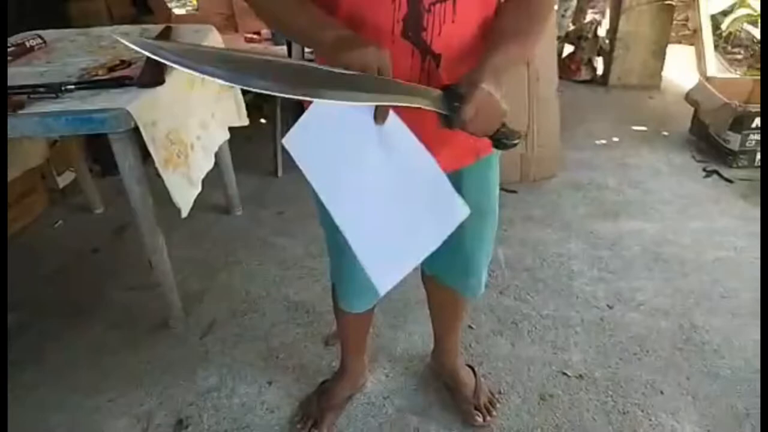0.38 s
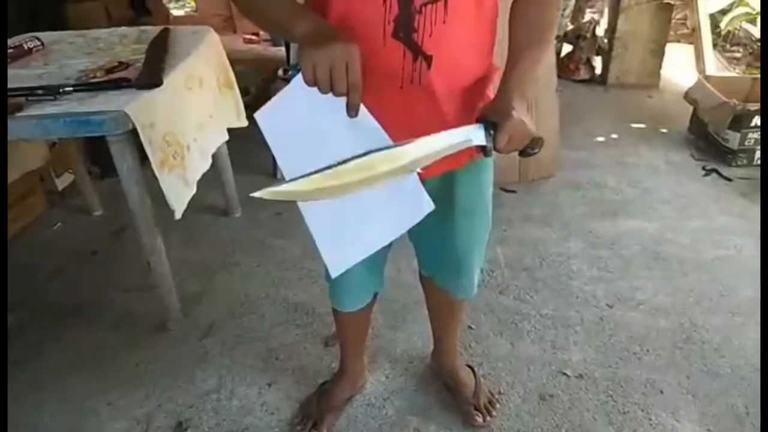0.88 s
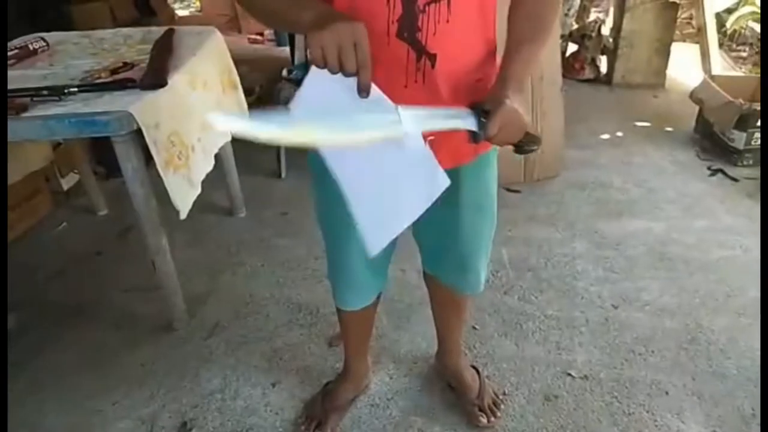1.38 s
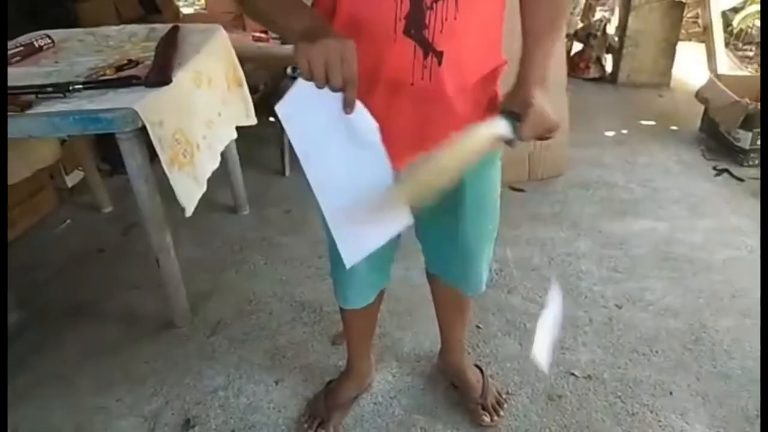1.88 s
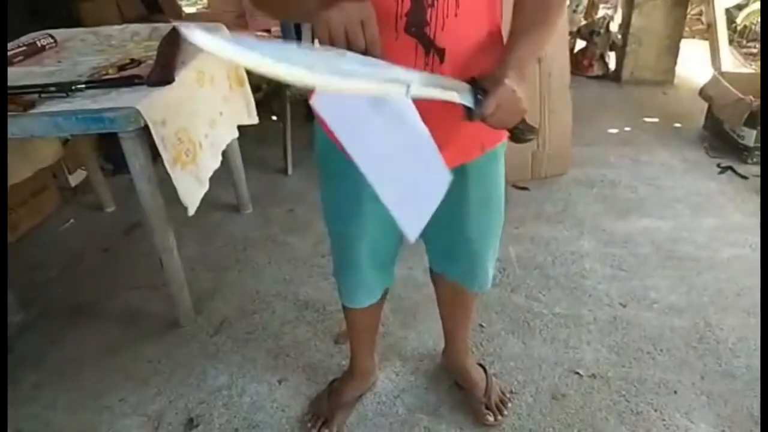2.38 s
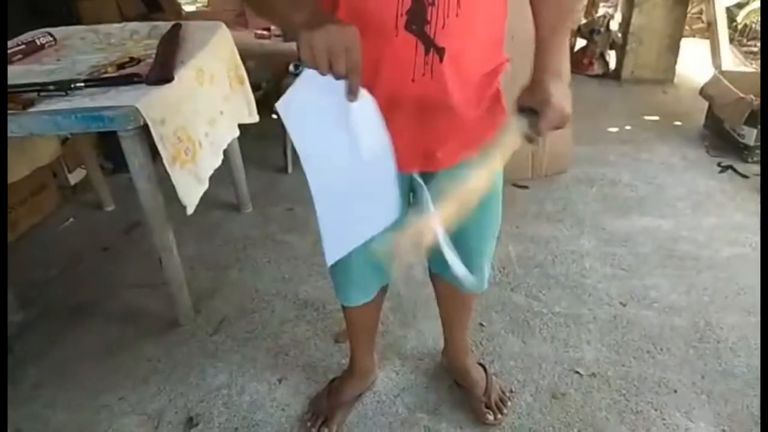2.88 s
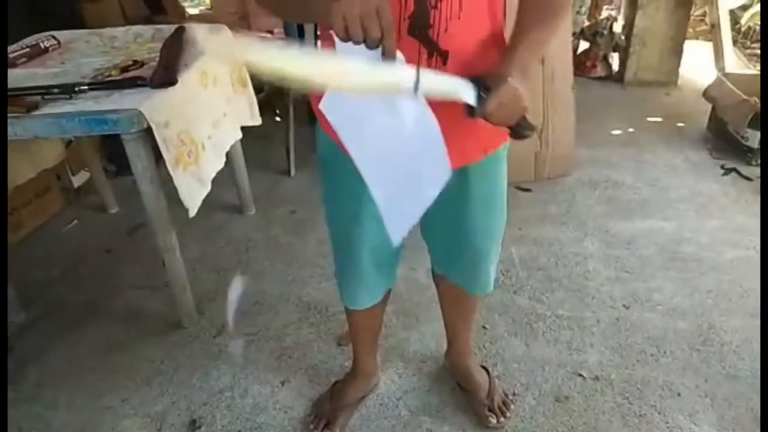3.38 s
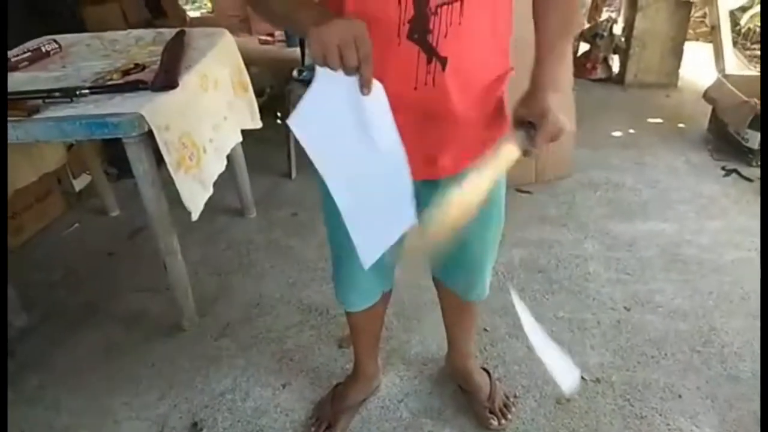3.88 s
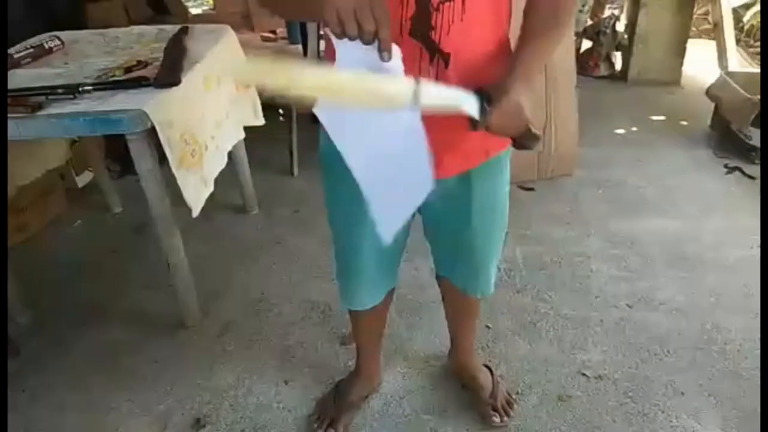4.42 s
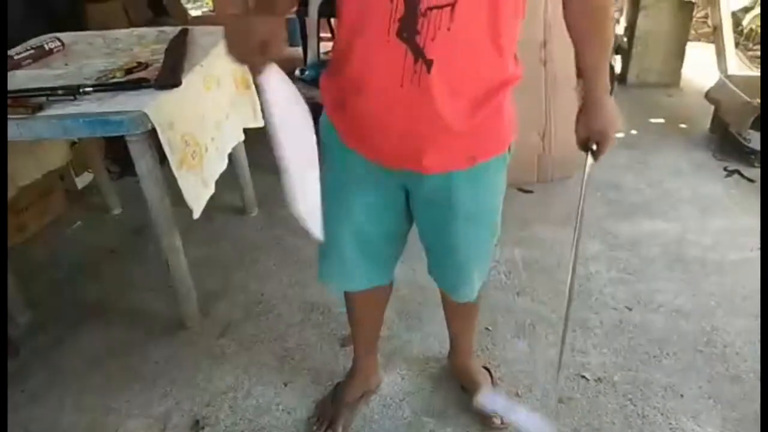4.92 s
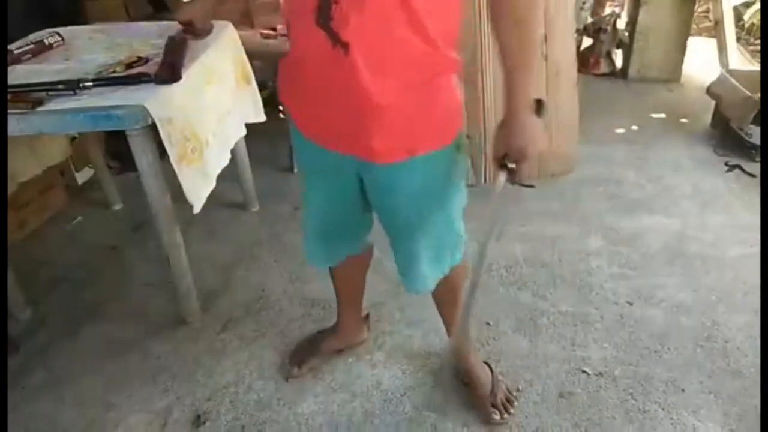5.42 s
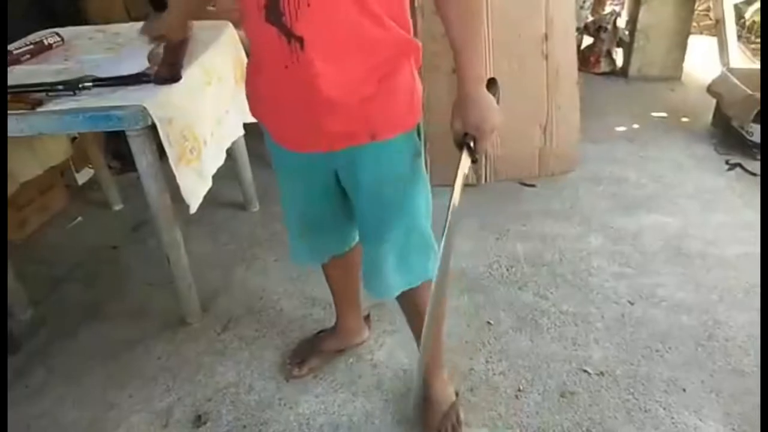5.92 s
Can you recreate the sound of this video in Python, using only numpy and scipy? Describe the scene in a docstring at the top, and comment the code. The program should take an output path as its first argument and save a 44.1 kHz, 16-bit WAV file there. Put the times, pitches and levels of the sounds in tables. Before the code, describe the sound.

In an open concrete shed, a blade rips through a hand-held sheet in five dry, crackling strokes of about half a second, with small rustles between them. The later cuts are stronger, and the last begins with a sharp snap. Then the paper is laid down with faint flutters and small hollow taps. Underneath are low soft thuds, a distant idling engine and a quiet airy outdoor murmur, recorded in stereo from nearby.

```python
"""A long blade slices five strips off a sheet of paper in an open concrete shed; the sheet is then laid on a table.
Parting fibres make a dense crackle of random clicks, which the resonances of the sheet colour.
Paper and table clatter as ticks in small hollow resonances; something is dragged briefly over the floor in uneven slips.
Far off an engine throbs at idle and something thuds twice, as short swells of low tone over narrow noise.
The yard murmurs as drifting coloured noise, and sparse random echoes make the shed answer."""
import sys
import numpy as np
from scipy import signal
from scipy.fft import rfft, irfft
from scipy.io import wavfile
from scipy.ndimage import uniform_filter1d

SR = 44100
rng = np.random.default_rng(int(sys.argv[2]) if len(sys.argv) > 2 else 0)


def ratio_of_db(decibels):
    """Turn decibels (scalar or array-like) into linear amplitude factors; 0 dB maps to 1."""
    return 10 ** (np.asarray(decibels, float) / 20)


def transcribe(signal):
    """Save signal, clipped to [-1, 1], as a 16-bit WAV file at the path in sys.argv[1]."""
    frames = np.atleast_2d(signal).T
    limited = np.clip(frames, -1, 1)
    pcm = np.round(limited * 32767).astype(np.int16)
    wavfile.write(sys.argv[1], SR, pcm)


N = 266364  # length in samples

# Levels of the paper, clatter and drag are those before the final mix.
# Pressure of the edge, one curve a cut; the third is the second strip scraping off the blade.
# Each row of a curve: time in seconds, tearing level in dB.
CUT_PRESSURES = [
    [(.495, -57), (.507, -44), (.531, -41), (.605, -54.5), (.628, -45), (.65, -39.5), (.76, -41.5),
     (.885, -38), (.93, -52), (.97, -61)],
    [(1.275, -54), (1.285, -47.5), (1.299, -42), (1.363, -34), (1.45, -35), (1.6, -33), (1.64, -43.5),
     (1.69, -62)],
    [(1.6, -52), (1.648, -43), (1.696, -41), (1.738, -43.5), (1.84, -63.5), (1.87, -56.5), (1.96, -74.5)],
    [(2.27, -61), (2.279, -49), (2.3, -41.5), (2.446, -39), (2.484, -33.5), (2.514, -38.5), (2.646, -32),
     (2.668, -42), (2.72, -57.5), (2.78, -60)],
    [(3.255, -64), (3.294, -41.5), (3.39, -39.5), (3.465, -32), (3.51, -37), (3.53, -29), (3.57, -30),
     (3.62, -31.5), (3.69, -47), (3.76, -75)],
    [(4.18, -55), (4.19, -45), (4.22, -54), (4.255, -47.5), (4.3, -35.5), (4.342, -39.5), (4.43, -32.5),
     (4.53, -29.5), (4.59, -29), (4.638, -39.5), (4.7, -61), (4.76, -82)],
]
# Colour of each cut. Each row: sheet flexing at the start and once freed in dB, edge hiss at the start and
# once freed in dB, starting pitch of the flap resonance in Hz, its strength in dB.
CUT_COLOURS = [(-25, -9, -12.5, -10.5, 3570, 6.5), (-15.5, -13.5, -8, -10, 3400, 4.5),
               (2.5, 1, -29, -21, 3500, 4), (-11.5, -15.5, -10.5, -8, 3300, 4.5),
               (-10.5, -8.5, -5.5, -9, 3200, 4.5), (-16, -5.5, -9.5, -12, 3300, 2.5)]
# The flexing, hiss and crispness, in dB, at which the sheet has its plain colour.
PLAIN_COLOUR_DB = (-11, -8, -3)
# Plain colour of the sheet. Each row: frequency in Hz, relative level in dB.
SHEET_SPECTRUM = [(120, -57), (200, -26), (474, -29.5), (537, -7), (687, -14.5), (1230, -7.5), (1690, -4.5),
                  (2010, -8), (3480, -4), (5900, -1), (7820, -11), (8540, -13.5), (10200, -7.5),
                  (12600, -8), (13500, -10)]
# The sheet rustles in the hand. Each row: time of the peak in seconds, peak tearing level in dB,
# rise in seconds, fall in seconds, brightness in dB.
HAND_RUSTLES = [(.004, -47.5, 0.0041, 0.023, -20), (0.136, -54, .015, 0.21, -1.5),
                (0.381, -56.5, 0.037, 0.16, -8.5), (2.858, -58.5, 0.041, 0.056, 4),
                (3.23, -60, 0.043, 0.044, -6), (4.11, -61.5, .015, 0.02, -4),
                (4.835, -58.5, 0.077, 0.033, 7.5), (5.15, -66, 0.018, 0.093, -2),
                (5.275, -54.5, .05, 0.073, -5.5), (5.401, -73, 0.052, 0.14, 8),
                (5.872, -59, 0.19, 0.071, 2.5), (5.989, -65, .03, 0.031, -2)]
# Single snaps where the edge bites. Each row: start in seconds, peak in dB, centre in Hz.
EDGE_SNAPS = [(0.5054, -35, 3620), (2.2799, -31, 2820), (4.1891, -36, 4800), (4.296, -16, 3670)]
# How the paper leans to one side. Each row: frequency in Hz, left minus right in dB.
PAPER_LEAN = [(60, 0.0), (130, 10), (280, -4), (610, 1), (1330, 0.5), (2890, 3.5), (6280, -5), (13600, 6)]
# Small hollow clatters of paper and table. Each row: time in seconds (the peak comes 5 ms before it),
# level before fading in dB, centre in Hz, fading time in seconds.
HOLLOW_CLATTERS = [(0.364, -55, 920, 0.043), (0.686, -49, 1510, 0.022), (2.666, -44.5, 1040, 0.013),
                   (2.171, -67, 1020, 0.067), (2.737, -49.5, 850, 0.029), (3.063, -61.5, 920, 0.034),
                   (4.975, -59, 815, 0.033), (5.319, -51.5, 920, 0.02), (5.495, -57, 1350, 0.025),
                   (5.69, -59, 1060, 0.012), (5.955, -58, 1410, 0.016)]
# Loudness of the drag over the floor. Each row: time in seconds, level of each ring's shared curve in dB.
DRAG_LEVEL = [(1.57, -70), (1.59, -51), (1.64, -48), (1.684, -43), (1.798, -58.5), (1.89, -62),
              (1.912, -63.5), (1.984, -72), (2.08, -98)]
# Resonances of the dragged object. Each row: frequency in Hz, width in Hz, relative level in dB.
DRAGGED_RINGS = [(140, 99, -8.5), (256, 100, -14.5), (324, 74, -5), (406, 82, 2), (606, 170, -3.5),
                 (812, 85, -1), (970, 270, 0), (1420, 170, -18)]
# Low thuds, bumps and uneven engine throbs at set times.
# Each row: time of the middle in seconds, level in dB, pitch in Hz.
SET_BUMPS = [(.119, -42.5, 242), (0.302, -48.5, 64), (0.374, -43.5, 74.5), (.525, -44.5, 267),
             (0.686, -49, 68.7), (.71, -41, 285), (1.477, -31.5, 88.6), (1.562, -37.5, 86),
             (1.67, -40, 140), (2.128, -49, 62), (2.73, -45, 246), (2.805, -53, 62), (2.845, -46, 139),
             (2.936, -50.5, 64), (3.032, -45, 129), (3.122, -46.5, 123), (3.213, -47, 137), (3.42, -49, 64),
             (3.619, -48.5, 64.3), (3.868, -53.5, 61.5), (4.141, -52.5, 61), (4.244, -50, 60.4),
             (4.414, -49.5, 63), (4.56, -46, 65), (4.578, -40.5, 274), (4.851, -48.5, 177),
             (5.247, -47, 153), (4.449, -47.5, 270), (4.506, -45.5, 272), (0.301, -45, 246),
             (3.139, -44.5, 263)]
# The two pitches in Hz, low and high, around which the randomly scattered bumps lie.
SCATTERED_PITCHES_HZ = (140, 260)
# Steady part of the engine. In order: frequency in Hz, width in Hz, level in dB.
ENGINE_IDLE = (62.8, 4.1, -68.5)
# Colour of the low murmur of the yard. Each row: frequency in Hz, relative level in dB.
MURMUR_SPECTRUM = [(15, -72), (25, -38), (48, -26), (123, -3.5), (176, -9.5), (321, -10), (484, -13.5),
                   (648, -17), (1010, -21.5), (1500, -28), (1950, -82), (3300, -120)]
# Loudness of the low murmur. Each row: time in seconds, level in dB.
MURMUR_LEVEL = [(0.0, -55), (0.3, -55), (0.71, -54), (1.11, -63), (1.48, -56.5), (1.83, -51.5),
                (2.1, -57.5), (3.58, -56.5), (4.09, -60.5), (4.41, -56), (4.56, -51.5), (5.06, -61),
                (5.58, -57), (6.04, -61.5)]
# Colour of the airy treble of the yard. Each row: frequency in Hz, relative level in dB.
AIR_SPECTRUM = [(530, -21), (900, -7), (1150, -13), (1260, -15.5), (1420, -10), (2130, -10), (3090, -13.5),
                (3350, -10), (5270, -18.5), (13500, -26)]
# Loudness of the airy treble. Each row: time in seconds, level in dB.
AIR_LEVEL = [(0, -53), (.5, -71.5), (1.2, -67), (2.1, -65.5), (3.1, -65.5), (4, -67), (4.9, -64),
             (5.4, -62), (6.04, -61)]
# How alike left and right are outdoors. Each row: frequency in Hz, likeness (1 is identical).
SIDE_LIKENESS = [(60, 1), (180, 0.92), (530, 0.73), (1500, 0), (4600, 0.07), (13600, 0.)]
# Echo of the shed. Each row: frequency in Hz, time in seconds to die by 60 dB.
SHED_DECAY = [(250, 0.19), (1000, 0.19), (4000, 0.22), (12000, 0.11)]

FLAP_SAG, FREE_AT = 0.063, 0.77  # share of pitch the flap loses; share of the cut at which it is free
WANDER_DB, CRISP_DB = 1.8, 0.5  # random drift of flexing, hiss and crispness; crispness over hiss
RUSTLE_EDGE_DB, RUSTLE_FLAP_HZ = -15, 3500  # ends of a rustle below its peak; its flap resonance
DULL_FLEXING = 0.65  # dB of flexing gained per dB of brightness lost
BUMP_S, SHORTER = 0.059, 0.79  # half-length in seconds at 65 Hz; power by which higher bumps are shorter
SCATTERED_BUMPS, SCATTERED_DB = 24, -52.5  # number of bumps at random times and their middle level
FIRST_THROB_S, THROB_GAP_S = 5.115, 0.118  # the engine settles into an even beat
THROB_DB, THROB_HZ = -50, 67


def evened(x):
    """Scales a sound to an rms of 1."""
    return x / np.sqrt(np.mean(x ** 2) + 1e-20)


def read(points, hz):
    """Reads a spectrum between its points, with frequency on a log axis."""
    f, value = np.transpose(points)
    return np.interp(np.log(hz + 1), np.log(f + 1), value)


def along(rows, t):
    """Reads a curve of level against time."""
    times, values = np.transpose(rows)
    return np.interp(t, times, values)


def add(mix, s, sound):
    """Mixes a sound in, starting at s seconds."""
    part = mix[round(s * SR):][:len(sound)]
    part += sound[:len(part)]


def resonate(x, hz, width):
    """Rings one resonance of gain 1: shift it down to 0 Hz, smooth, shift back up."""
    turn = np.exp(2j * np.pi * hz * np.arange(len(x)) / SR)
    r = np.exp(-np.pi * width / SR)
    return 2 * (turn * signal.lfilter([1 - r], [1, -r], x / turn)).real


def patches(bins, frames, tall, long):
    """Makes random blobs over frequency and time, of rms 1."""
    z = rng.standard_normal((frames, bins)).T
    smooth = uniform_filter1d(z, tall, 0)
    return evened(uniform_filter1d(smooth, long, 1))


def two_sides(left, other, same):
    """Pairs a signal with one that is partly alike, by mixing in an independent signal."""
    return np.array([left, same * left + np.sqrt(1 - same ** 2) * other])


def crackle(count, per_s, spread_db):
    """Scatters random clicks of either sign, a few of them large, as separate breaks or slips would."""
    chance, size, sign = rng.random((count, 3)).T
    happens = chance < per_s / SR
    height = ratio_of_db(spread_db * np.minimum(-np.log(size + 1e-9), 4))
    return evened(happens * np.sign(sign - 0.5) * height)


def stroke(rows, flexing_db, freed_db, hiss_db, last_hiss_db, flap_hz, flap_db):
    """Parting fibres click in clumps; the sheet colours them with shifting resonances, differently to each side."""
    t = np.arange(rows[0][0], rows[-1][0], 1 / SR)
    # The edge catches and lets go.
    clumps = ratio_of_db(1.4 * evened(uniform_filter1d(rng.standard_normal(len(t)), size=200)))
    fibres = [evened(clumps) * crackle(len(t), 7000, spread_db=1.8) for side in range(2)]
    hz, s, (left, other) = signal.stft(np.array(fibres), SR, nperseg=256, noverlap=192)
    f = hz[:, None] + 1

    # The flap comes free as the cut goes on, and its ring sinks.
    free = np.minimum(s / s[-1] / FREE_AT, 1) ** 0.84
    drift = WANDER_DB * patches(3, len(s), tall=1, long=30)
    from_plain = drift - np.array(PLAIN_COLOUR_DB)[:, None]
    flexing = flexing_db + (freed_db - flexing_db) * free + from_plain[0]
    edge = hiss_db + (last_hiss_db - hiss_db) * free
    hiss = edge + from_plain[1]
    crisp = edge + from_plain[2] + CRISP_DB
    flap = flap_hz * (1 - FLAP_SAG * free)

    # Short waves leave the sheet in unlike directions.
    z = two_sides(left, other, same=1 / (1 + f / 3000))

    # Flexing fills the lows, hiss and crispness the highs, and the flap rings in between.
    lows_db = flexing / (1 + (f / 1700) ** 6) / (1 + (620 / f) ** 6)
    hiss_part_db = hiss / (1 + (8300 / f) ** 12)
    crisp_part_db = crisp * np.exp(-(np.log(f / 6200) / 0.23) ** 2)
    ring_db = flap_db * np.exp(-(np.log(f / flap) / 0.5) ** 2)
    shifting_db = 3.0 * patches(*left.shape, tall=2, long=14)
    colour = ratio_of_db(read(SHEET_SPECTRUM, f) + lows_db + hiss_part_db + crisp_part_db + ring_db + shifting_db)

    # The tearing band carries the level.
    band = (hz > 1800) & (hz < 6000)
    colour = colour / np.sqrt((colour[band] ** 2).sum(0) / len(hz))
    sound = signal.istft(z * colour, SR, nperseg=256, noverlap=192)[1][:, :len(t)]
    return sound * ratio_of_db(along(rows, t)) * signal.windows.tukey(len(t), 0.03)


def rustle(s, db, rise, fall, bright_db):
    """A softer stroke as the sheet moves in the hand; a duller rustle flexes more. Returns start and sound."""
    rows = [(max(s - rise, 0), db + RUSTLE_EDGE_DB), (s, db), (s + fall, db + RUSTLE_EDGE_DB)]
    flexing_db = PLAIN_COLOUR_DB[0] - DULL_FLEXING * bright_db
    hiss_db = PLAIN_COLOUR_DB[1] + bright_db
    return rows[0][0], stroke(rows, flexing_db, flexing_db, hiss_db, hiss_db, RUSTLE_FLAP_HZ, flap_db=2.5)


def snap(db, hz):
    """A biting edge gives a puff of noise through a broad resonance, with a quick rise and fall."""
    t = np.arange(600) / SR
    puff = rng.standard_normal(len(t))
    ring = resonate(resonate(puff, hz, 4700), hz, 5500)
    ring = ring * np.exp(-t / 0.0034) * (1 - np.exp(-t / 0.00026))
    ring = signal.sosfilt(signal.butter(2, 1100, "high", fs=SR, output="sos"), ring)  # no bass in a snap
    return ratio_of_db(db) / abs(ring).max() * ring


def paper():
    """The sheet sounds through all its cuts and rustles, and the single snaps."""
    out = np.zeros((2, N))
    for rows, colour in zip(CUT_PRESSURES, CUT_COLOURS):
        add(out.T, rows[0][0], stroke(rows, *colour).T)
    for row in HAND_RUSTLES:
        start, sound = rustle(*row)
        add(out.T, start, sound.T)
    for s, db, hz in EDGE_SNAPS:
        add(out.T, s, snap(db, hz)[:, None])  # alike on both sides
    return out


def clatter():
    """Short bunches of ticks ring a small hollow resonance of paper and table."""
    out = np.zeros(N)
    for s, db, hz, length in HOLLOW_CLATTERS:
        t = np.arange(-0.01, 3 * length, 1 / SR)
        ticks = crackle(len(t), 1500, spread_db=4.0)
        ring = evened(resonate(resonate(ticks, hz, 260), hz, 460))
        swell = np.exp(-abs(t) / np.where(t < 0, 0.006, length))
        add(out, s - 0.015, ratio_of_db(db) * ring * swell)
    return out


def drag():
    """Uneven slips over the floor ring the resonances of the dragged object."""
    t = np.arange(DRAG_LEVEL[0][0], DRAG_LEVEL[-1][0], 1 / SR)
    slips = crackle(len(t), 900, spread_db=1.5)
    rings = 0
    for hz, width, db in DRAGGED_RINGS:
        rings = rings + ratio_of_db(db) * evened(resonate(resonate(slips, hz, width), hz, 2 * width))
    out = np.zeros(N)
    add(out, t[0], rings * ratio_of_db(along(DRAG_LEVEL, t)) * signal.windows.tukey(len(t), 0.1))
    return out


def scattered_bump():
    """Picks a bump at a random time, low or high; the stronger it is, the higher it lies around its pitch."""
    u, v, w = rng.random(3)
    s = 0.081 + u * (N / SR - 0.2)
    return s, SCATTERED_DB + 6 * (v - 0.5), SCATTERED_PITCHES_HZ[int(w < 0.5)] * (0.96 + 0.14 * v)


def lows():
    """Each engine throb, thud or bump is a few cycles of low tone that swell and fade."""
    out = np.zeros(N)
    throbs = [(s, THROB_DB, THROB_HZ) for s in np.arange(FIRST_THROB_S, N / SR, THROB_GAP_S)]
    scattered = [scattered_bump() for _ in range(SCATTERED_BUMPS)]
    for s, db, hz in list(SET_BUMPS) + throbs + scattered:
        length = BUMP_S * (65 / hz) ** SHORTER
        t = np.arange(-length, length, 1 / SR)
        phase = 2 * np.pi * (hz * t + rng.random())
        tone = np.sin(phase) + 0.13 * np.sin(2 * phase)
        add(out, s - length, ratio_of_db(db) * np.exp(-(2.55 * t / length) ** 2) * tone)
    return out


def engine_idle():
    """The steady part of the engine is noise through one narrow low resonance, so it is unsteady in level."""
    hz, width, db = ENGINE_IDLE
    noise = rng.standard_normal(N)
    return ratio_of_db(db) * evened(resonate(resonate(noise, hz, width), hz, width))


def outdoors(spectrum, level, lumps_db):
    """Noise of one colour whose level drifts in lumps, partly alike on the two sides."""
    frames, hz = N // 256 + 5, np.fft.rfftfreq(1024, 1 / SR)
    a, b, c, d = rng.standard_normal((frames, 513, 4)).T
    same = np.clip(read(SIDE_LIKENESS, hz), -1, 1)[:, None]
    z = two_sides(a + 1j * b, c + 1j * d, same)
    lumps = lumps_db * patches(513, frames, tall=6, long=7)
    z *= ratio_of_db(read(spectrum, hz)[:, None] + lumps)
    noise = evened(signal.istft(z, nperseg=1024, noverlap=768)[1][:, :N])
    return noise * ratio_of_db(along(level, np.arange(N) / SR))


def yard():
    """The yard is a low murmur and an airy treble, both of drifting noise, with the engine's idle."""
    murmur = outdoors(MURMUR_SPECTRUM, MURMUR_LEVEL, lumps_db=4.0)
    air = outdoors(AIR_SPECTRUM, AIR_LEVEL, lumps_db=4.0)
    return murmur + air + engine_idle()


def shed(x):
    """The shed answers with sparse echoes of random sign, each band dying at its own speed."""
    taps = np.zeros((2, SR // 2))
    slots = np.arange(100, SR // 2 - 20, 20)  # one echo in every 20 samples
    at = slots + rng.integers(0, 20, (2, len(slots)))
    np.put_along_axis(taps, at, rng.choice([-1., 1.], at.shape), 1)
    hz, t, z = signal.stft(taps, SR, nperseg=256)
    dying = ratio_of_db(-60 * t / read(SHED_DECAY, hz)[:, None])
    tail = signal.istft(z * dying, SR, nperseg=256)[1]
    return signal.fftconvolve(x[None], tail / np.linalg.norm(tail[0]), axes=1)[:, :N]


def scene():
    """The paper reaches the right side a few samples first; the shed answers; the low sounds and yard join in."""
    near, far = paper(), drag() + clatter()
    hz = np.fft.rfftfreq(N, 1 / SR)
    lean = ratio_of_db(np.outer([0.5, -0.5], read(PAPER_LEAN, hz)))
    delay_s = np.array([[0.00006], [0]])  # left, right
    direct = irfft(rfft(near) * lean * np.exp(-2j * np.pi * hz * delay_s), N)
    echo = shed(ratio_of_db(-7.5) * near[0] + far)
    return ratio_of_db(0.5) * direct + echo + ratio_of_db(-0.5) * far + lows() + yard()


def band_limit(x):
    """A steep low-pass at the top of the band."""
    return signal.sosfilt(signal.butter(12, 14230, fs=SR, output="sos"), x)


def record(dry):
    """A low-pass filter takes off the treble above about 13.2 kHz."""
    low_pass = signal.firwin(255, 13200, window=("kaiser", 8), fs=SR)
    dull = signal.oaconvolve(dry, low_pass[None], "same")
    return band_limit(dull)


dry = scene()
out = record(dry)
transcribe(out)
```